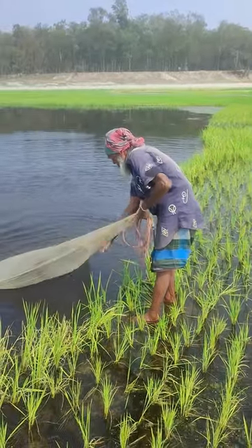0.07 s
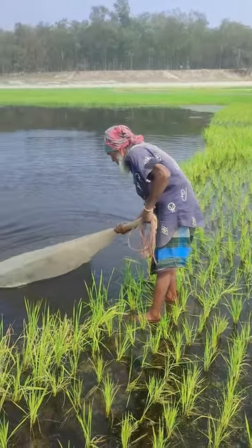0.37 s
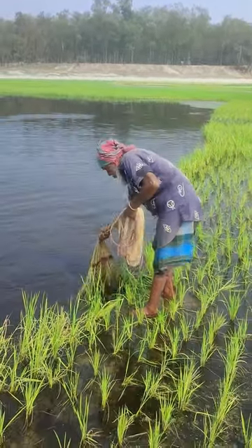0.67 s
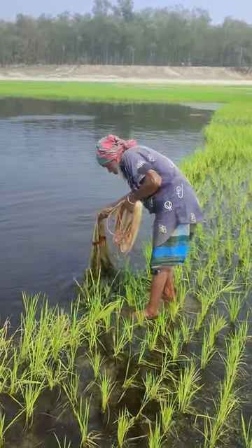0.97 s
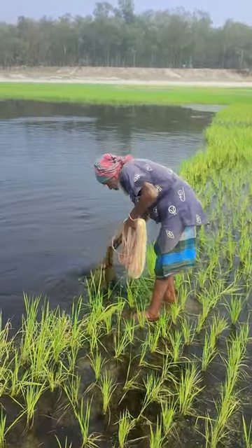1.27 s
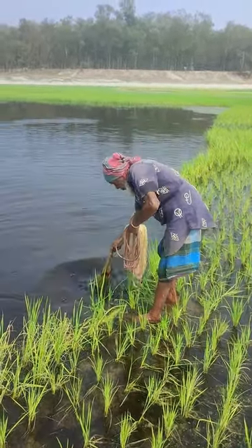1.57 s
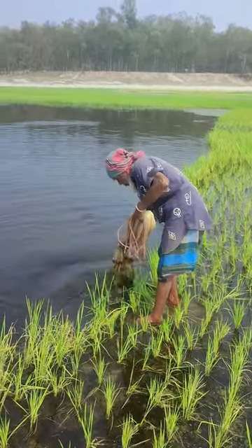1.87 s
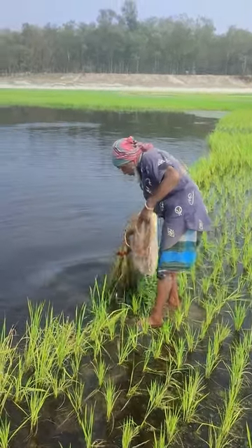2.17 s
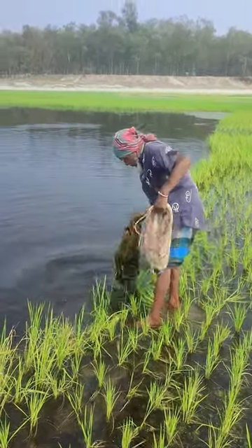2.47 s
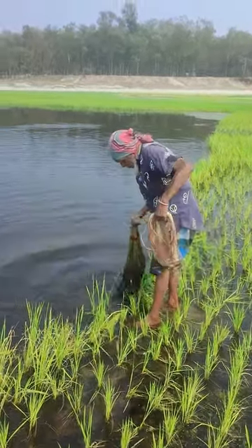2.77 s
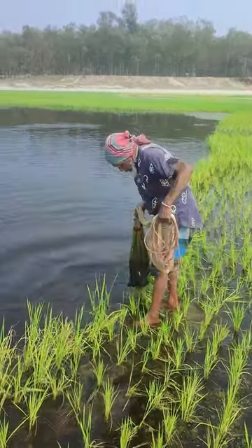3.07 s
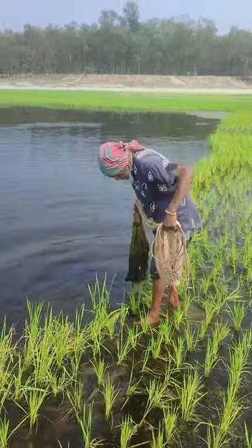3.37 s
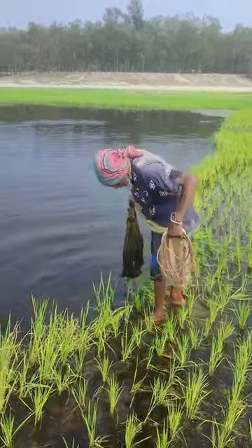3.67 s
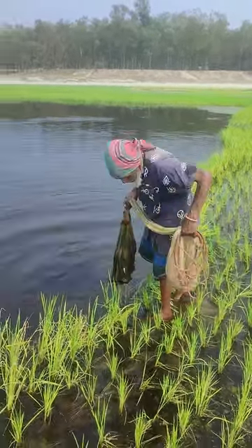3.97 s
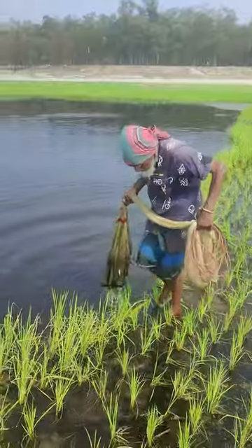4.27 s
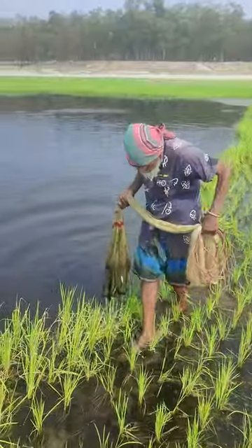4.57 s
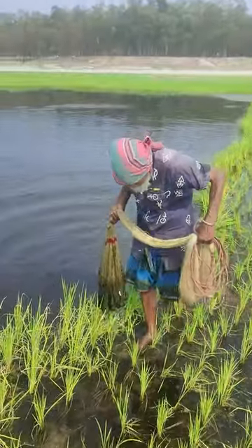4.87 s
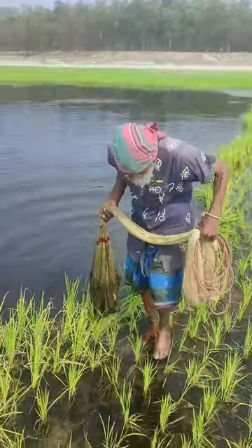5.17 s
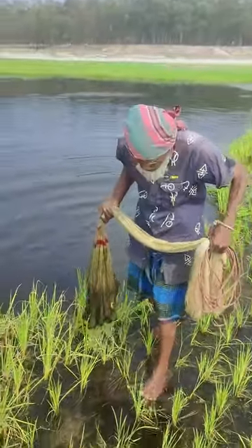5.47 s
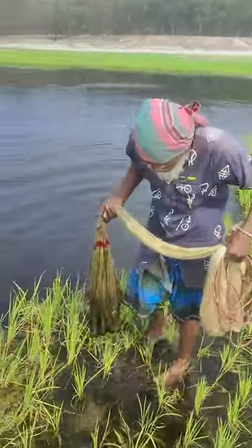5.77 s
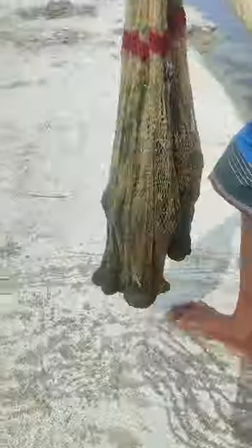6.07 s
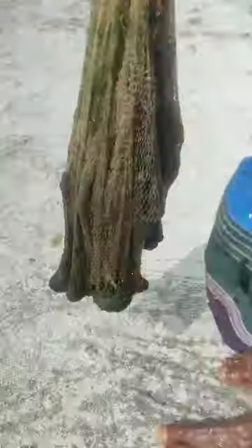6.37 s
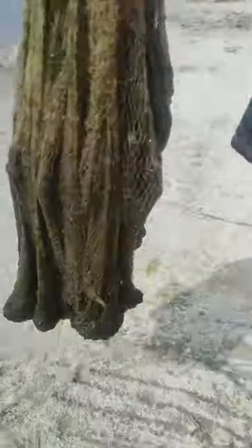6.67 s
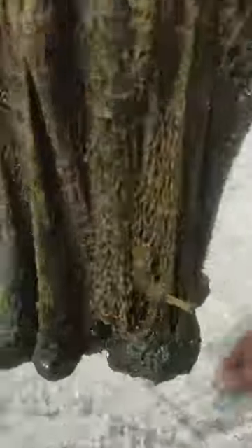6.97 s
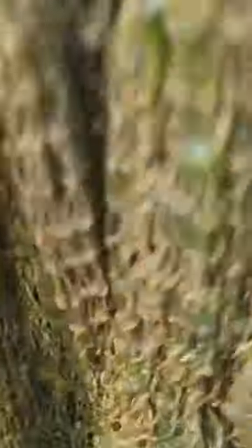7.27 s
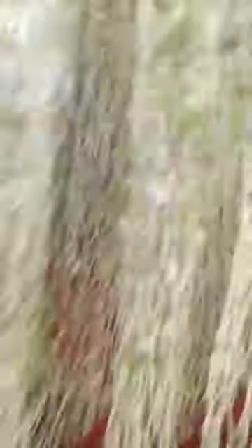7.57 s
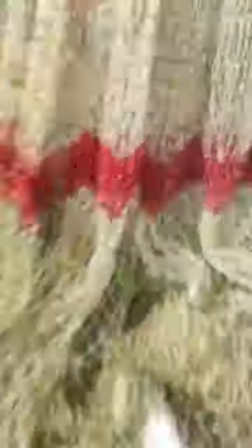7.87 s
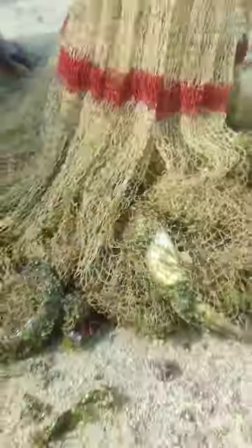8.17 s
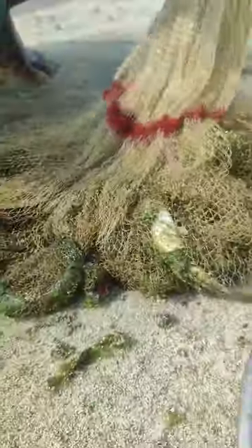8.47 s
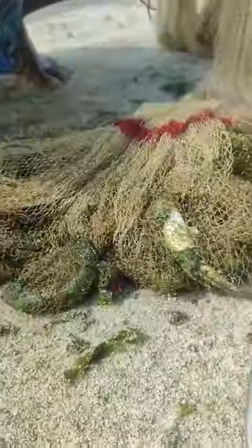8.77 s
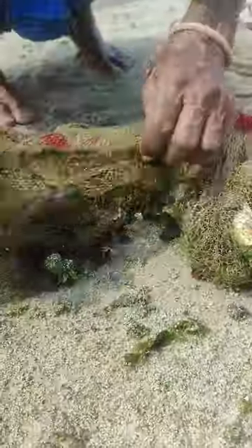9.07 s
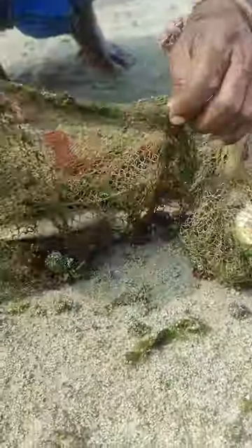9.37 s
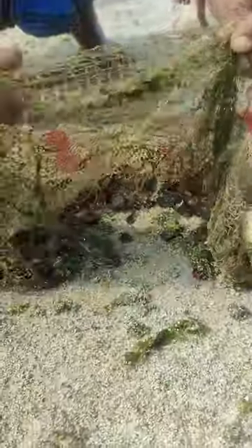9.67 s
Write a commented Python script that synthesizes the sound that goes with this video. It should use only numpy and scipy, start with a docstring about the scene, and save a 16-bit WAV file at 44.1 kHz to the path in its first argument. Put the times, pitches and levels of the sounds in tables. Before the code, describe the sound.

A wet fishing net is hauled from shallow water with small splashes, gurgles and pattering drips, and bare feet wade ashore a few metres away. Fingers rumble and knock on the microphone's right side. The water stops and the mesh swishes and ticks close by. The sound cuts out briefly and returns with loud pops on the right, followed by soft rustles and a squelch on sand. Light wind and a distant bird stay faint.

```python
"""Hauling a cast net

A wet net is pulled from shallow water: it splashes and drains in drips and ringing bubbles as bare
feet wade ashore. On the sand the mesh swishes, ticks and squelches. Light wind blows and a bird
calls far off. Fingers bump the phone's right microphone port; the sound drops out briefly and
that channel comes back with a few pops."""
import sys
import numpy as np
from scipy import signal
from scipy.fft import rfft, irfft
from scipy.io import wavfile
from scipy.ndimage import uniform_filter1d

SR = 44100
rng = np.random.default_rng(int(sys.argv[2]) if len(sys.argv) > 2 else 0)


def store_wav(level_fs):
    """Save 16-bit WAV to argv[1]."""
    pcm = np.round(np.clip(np.atleast_2d(level_fs), -1, 1) * 32767)
    wavfile.write(sys.argv[1], SR, pcm.T.astype(np.int16))


N = 433062
T = np.arange(N) / SR


def undb(db):
    """Decibels to gain."""
    return 10 ** (np.asarray(db) / 20)


def unit(x):
    """Scale to rms 1."""
    return x / np.sqrt(np.mean(x ** 2) + 1e-20)


def pan(left_minus_right_db):
    """Left and right gains."""
    return undb(np.array([[left_minus_right_db], [-left_minus_right_db]]) / 2)


def colour(x, spectrum):
    """Filter by a spectrum of (Hz, dB) points; rms 1."""
    hz, db = np.transpose(spectrum)
    bins_hz = np.maximum(np.fft.rfftfreq(x.shape[-1], 1 / SR), 1)
    gain = undb(np.interp(np.log(bins_hz), np.log(hz), db))
    return unit(irfft(rfft(x) * gain, x.shape[-1]))


def band(x, hz, q):
    """One resonance."""
    hz = min(hz, 0.4 * SR)
    return signal.lfilter(*signal.iirpeak(hz, max(q, 3 * hz / SR), fs=SR), x)


def steep_band(x, hz, q):
    """The same resonance twice."""
    return band(band(x, hz, q), hz, q)


def lowpass(x, hz, order):
    """Take off the treble."""
    return signal.lfilter(*signal.butter(order, hz, fs=SR), x)


def add(track, s, sound):
    """Mix a sound into a track at s seconds."""
    i = int(np.clip(s * SR, 0, N - 1))
    track[..., i:i + sound.shape[-1]] += sound[..., :N - i]


def walk(rate_hz):
    """Smooth random wander; rms 1."""
    step = int(SR / rate_hz)
    stairs = np.repeat(rng.standard_normal(N // step + 1), step)[:N]
    return unit(uniform_filter1d(stairs, step))


def swells(rows, rise_s, fall_s):
    """Gain from (start s, dB, hold s) rows: each rises, holds and dies away; overlaps add in power."""
    power = np.zeros(N)
    for s, db, hold_s in rows:
        rise = np.clip((T - s) / rise_s, 0, 1)
        fall = np.exp(-np.maximum(T - s - hold_s, 0) / fall_s)
        power += (undb(db) * rise * fall) ** 2
    return np.sqrt(power)


def crackle(per_s, spread_db, width=2.8):
    """Dense tiny impacts, each reaching the two ports with its own strength; rms 1."""
    size = undb(spread_db * np.minimum(rng.exponential(size=N), 5))
    at_ports = rng.choice([-1, 1], N) + width * rng.standard_normal((2, N))
    return unit((rng.random(N) < per_s / SR) * size * at_ports)


def outdoors(x, scatter_db, decay_s):
    """Direct sound plus brief scatter from water and plants, new for every spot and each port."""
    t = T[:SR // 50]
    response = rng.standard_normal((2, len(t))) * np.exp(-t / decay_s)
    response *= undb(scatter_db) / np.sqrt(np.sum(response ** 2, axis=1, keepdims=True))
    response[:, 0] += 1
    return signal.fftconvolve(x[None], response, axes=1) / np.sqrt(1 + undb(2 * scatter_db))


def bubble(hz, cycles, glide):
    """A bubble rings, fading 40 dB, and rises in pitch as it nears the surface."""
    age = np.arange(int(SR * cycles / hz) + 2) * hz / (SR * cycles)
    phase = 2 * np.pi * cycles * (age + glide * age ** 2 / 2)
    return np.sin(phase) * np.exp(-np.log(100) * age) * (1 - np.exp(-age * cycles))


def bubbles(low_hz, high_hz, cycles, spread_db, glide, count):
    """A shower of bubbles of mixed sizes; rms 1."""
    out = np.zeros((2, N))
    for when, pitch, weakness, life in rng.random((count, 4)):
        hz = low_hz * (high_hz / low_hz) ** pitch
        gain = np.sqrt(hz) * undb(-spread_db * np.log(max(weakness, 0.03)))
        ring = bubble(hz, cycles * (0.5 + life), glide * life)
        add(out, when * N / SR, gain * outdoors(ring, scatter_db=4, decay_s=0.015))
    return unit(out)


def contact(db, hz, decay_ms, q, pan_db):
    """A burst of contact noise through a short resonance."""
    t = T[:SR // 25]
    shared, left, right = rng.standard_normal((3, len(t)))
    burst = (shared + 3.6 * np.array([left, right])) * np.exp(-1000 * t / decay_ms)
    ring = steep_band(burst, hz, q)
    return ring / np.abs(ring).max() * undb(db) * pan(pan_db)


def slurs(notes, bend, waver, rough_db, scatter_db):
    """Unsteady gliding tones that swell quickly and fade; with bend under 1 the glide flattens out."""
    out = np.zeros((2, N))
    wobble = 1 + waver * walk(300)
    flutter = unit(undb(rough_db * walk(400)))
    for s, db, start_hz, end_hz, length_s in notes:
        age = np.linspace(0, 1, int(length_s * SR))
        span = slice(int(s * SR), int(s * SR) + len(age))
        hz = start_hz * (end_hz / start_hz) ** (age ** bend) * wobble[span]
        envelope = undb(db) * np.sin(np.pi * age ** 0.46) * flutter[span]
        tone = envelope * np.sin(2 * np.pi * np.cumsum(hz) / SR)
        add(out, s, outdoors(tone, scatter_db, decay_s=0.013))
    return out


# Open-air spectrum. Each row: frequency in Hz, relative level in dB.
AIR_SPECTRUM = [(12, -33.5), (20, 1.5), (91, -3.5), (177, -12.5), (204, -16), (328, -22), (422, -23),
                (527, -23.5), (607, -27), (820, -27), (1660, -33.5), (5530, -41.5), (7310, -49.5),
                (14700, -39.5), (16000, -54)]
# Gusts on the ports. Each row: start in seconds, level in dB, hold in seconds.
GUSTS = [(5.9, -52, 1), (6.8, -48, 0.634)]


def air():
    """Light wind and far countryside, partly alike at the two ports; gusts as the phone is carried."""
    level = np.hypot(undb(-58), swells(GUSTS, rise_s=0.18, fall_s=0.025))
    noise = rng.standard_normal(N) + 1.06 * rng.standard_normal((2, N))
    return colour(noise, AIR_SPECTRUM) * level * undb(0.28 * walk(5.6))


# Pulls on the net. Each row: start in seconds, flow level in dB, hold in seconds, spray offset in dB.
PULLS = [(0, -65, 0.01, 0), (0.893, -65.5, 0.46, -4), (1.235, -63, 0.31, -1), (1.92, -58.5, 0.55, -4),
         (2.596, -52.5, 0.17, -2.5), (3.093, -72.5, 1.6, 5.5), (3.473, -61, 1.29, 1.5),
         (4.63, -61, 1.63, 1)]
PULL_RISE_S, DRAIN_S, TRICKLE_DB, ASHORE_S = 0.039, 0.25, -80.5, 5.95


def flow():
    """Bubble and spray gains: each pull lifts wet mesh that streams and drains, until it is ashore."""
    over_water = np.clip((ASHORE_S - T) / 0.0042 + 1, 0, 1)
    bubble_rows = [(s, db, hold_s) for s, db, hold_s, _ in PULLS]
    spray_rows = [(s, db + spray_db, hold_s) for s, db, hold_s, spray_db in PULLS]
    gains = [swells(rows, PULL_RISE_S, DRAIN_S) for rows in (bubble_rows, spray_rows)]
    return over_water * np.hypot(gains, undb(TRICKLE_DB))


# Spectrum of landing spray. Each row: frequency in Hz, relative level in dB.
SPRAY_SPECTRUM = [(300, -7), (500, -18), (900, -8), (1450, -10.5), (2000, -1), (3800, -3.5), (6800, -7),
                  (8500, -16), (10500, -19), (13000, -13.5), (16000, -25)]


def runoff(bubbling, spraying):
    """Water falls from the mesh in spurts: spray fizzes, small drops patter, larger ones trap bubbles."""
    spurts = undb(1.8 * walk(45))
    plops = bubbles(low_hz=608, high_hz=1876, cycles=30, spread_db=3.5, glide=0.16, count=3200)
    patter = bubbles(low_hz=1640, high_hz=7050, cycles=22, spread_db=5.5, glide=0.05, count=4000)
    drips = bubbles(low_hz=3100, high_hz=13100, cycles=2.4, spread_db=5.5, glide=0.057, count=700)
    fizz = colour(crackle(per_s=900, spread_db=1.5, width=0.69), SPRAY_SPECTRUM)
    spray = patter * undb(-5.5) + drips * undb(-17) + fizz * undb(-5)
    return spurts * (bubbling * plops * undb(-4) + spraying * spray)


PLINK_HZ, SPATTER_HZ, SPATTER_SPREAD_OCT = 1900, 3020, 0.58
REBOUND_MEAN_GAP_S, REBOUND_DB = 0.008, -8


def spatters(spraying, count):
    """Drops fall at random; each traps a ringing bubble, breaks up and lands again in weaker ticks."""
    out = np.zeros((2, N))
    for i, (size, pitch, side) in zip(rng.integers(0, N, count), rng.standard_normal((count, 3))):
        s, db = T[i], 14.5 + 2.5 * size
        plink = undb(db - 1) * bubble(PLINK_HZ * 2 ** (SPATTER_SPREAD_OCT * pitch), cycles=38, glide=0.12)
        add(out, s, spraying[i] * outdoors(plink, scatter_db=0, decay_s=0.008))
        for gap, detune in rng.random((3, 2)):
            hz = SPATTER_HZ * 2 ** (SPATTER_SPREAD_OCT * (pitch + 2 * detune - 1))
            add(out, s, spraying[i] * contact(db, hz, decay_ms=1.5, q=1.4, pan_db=-1.5 + 2.4 * side))
            s += 2 * gap * REBOUND_MEAN_GAP_S
            db += REBOUND_DB
    return out


# Bright ticks. Each row: start in seconds, level in dB, ring in Hz, decay in ms.
TICKS = [(0.022, -50, 2570, 1.5), (.058, -50, 3500, 1.2), (.169, -42.5, 1960, 4.9), (1.462, -53, 4600, 1.2),
         (2.68, -34.5, 2600, 2), (3.534, -37.5, 4000, 2.5), (3.621, -39.5, 5200, 1.5),
         (3.688, -39.5, 3500, 2), (3.975, -46, 2900, 2), (4.092, -46, 4260, 1.7), (4.115, -48, 4500, 2),
         (4.332, -50, 2400, 2), (4.468, -36.5, 3860, 1.3), (4.654, -39, 2330, 3), (4.734, -38, 3900, 1.3),
         (4.888, -37, 4880, 2.1), (4.919, -40.5, 2300, 2.2), (4.963, -40, 2420, 2), (5.151, -39, 3670, 1.2),
         (5.345, -43.5, 11000, 1.8), (5.726, -34.5, 2100, 2.4), (5.79, -43, 11000, 4.5),
         (5.924, -39, 5570, 2.3), (6.085, -34.5, 2400, 3.2), (6.31, -39, 12500, 1.17),
         (6.332, -48.5, 2500, 1.2), (6.449, -42, 1870, 0.87), (6.818, -39, 3480, 1.3),
         (6.844, -40.5, 5760, 1.5), (7.166, -38, 5500, 1.2), (7.2015, -29, 8400, 0.37),
         (7.244, -37, 9000, 0.68), (7.282, -41, 3900, 0.63), (7.86, -37, 6600, 0.71),
         (7.8943, -30.5, 12000, 2.2), (9.079, -43.5, 8180, 9), (9.353, -41, 9900, 1.3),
         (9.404, -37, 3020, 1.8), (9.418, -35.5, 11000, 1.6)]


def ticks():
    """Drops, knots and grit strike and ring briefly."""
    out = np.zeros((2, N))
    for s, db, hz, decay_ms in TICKS:
        add(out, s, contact(db, hz, decay_ms, q=1.02, pan_db=-1.5))
    return out


# Dry taps. Each row: start in seconds, level in dB, centre in Hz, left minus right in dB, cutoff in Hz.
TAPS = [(.039, -50, 1100, -2, 4000), (0.061, -44, 445, -16, 4000), (5.52, -37, 590, -1, 4000),
        (5.562, -38.5, 664, -20, 4000), (5.6127, -29, 1200, -5, 5000), (6.029, -37.5, 292, 4, 900),
        (6.2275, -35, 446, -1, 2500), (6.23, -37, 580, -1, 3200), (8.087, -47, 440, -6, 4000),
        (8.184, -48, 506, 0, 4000), (8.448, -45.5, 450, -1, 800), (8.48, -47, 430, 0, 804),
        (8.565, -53, 490, 5, 885), (9.226, -34.5, 930, 2, 2190)]
GRIT_DB, GRIT_DECAY_MS = -17, 1.5


def taps():
    """Handling, a footstep on the sand and the settling net: each tap is one sharp, damped push with grit
    crunching after it."""
    out = np.zeros((2, N))
    t = T[:SR // 25]
    for s, db, hz, pan_db, cutoff_hz in TAPS:
        push = undb(GRIT_DB) * rng.standard_normal((2, len(t))) * np.exp(-1000 * t / GRIT_DECAY_MS)
        push[:, 0] += 1
        tap = lowpass(band(push, hz, q=1), cutoff_hz, order=2)
        add(out, s, tap / np.abs(tap).max() * undb(db) * pan(pan_db))
    return out


def from_below(x, lag_ms=0.484, shadow_db=-2.5, dull_share=0.17):
    """The phone's body delays and shades sound from below on its way to the left port."""
    left = np.interp(T - lag_ms / 1000, T, x[0])
    left += dull_share * (lowpass(left, hz=2500, order=1) - left)
    return np.array([left, x[1]]) * pan(shadow_db)


# Spectra of slow rubbing and quick slips. Each row: frequency in Hz, relative level in dB.
RUB_SPECTRUM = [(250, 6.5), (700, 3.5), (2000, 5), (4000, 1.5), (7000, 5), (9500, -11), (13000, 0),
                (16000, -58)]
SLIP_SPECTRUM = [(300, 10), (900, -4), (1400, -4), (2000, -13), (3000, -1.5), (4100, -6.5), (5300, 8.5),
                 (6800, 5.5), (9000, -5), (13000, 10), (16000, 11)]
# The mesh is carried, lowered and spread. Each row: start in seconds, level in dB, hold in seconds.
RUBS = [(5.9, -67.5, 0.5), (6.42, -64.5, 0.66), (6.83, -61.5, 0.25), (7.14, -59.5, 0.11), (7.6, -78, 1),
        (8.3, -73.5, 1), (8.74, -65, 0.11), (9.33, -67, 0.13), (9.52, -69.5, 0.22)]
# Resonances of a quick scrape. Each row: frequency in Hz, Q, relative level in dB.
HOLLOW_MODES = [(1896, 2.9, 11), (3850, 13, 7), (6400, 2.3, -12)]
# Swishes. Each row: peak time in seconds, level in dB, rise and fall in seconds, centre in Hz,
# hollow ring over the rasp in dB.
SWISHES = [(.048, -60.5, 0.036, 0.037, 1210, -10), (6.045, -52.5, 0.022, 0.024, 900, -1.5),
           (6.058, -70.5, 0.01, 0.069, 2960, 13), (6.22, -58.5, 0.047, .015, 2020, -10),
           (6.486, -55, 0.013, 0.016, 2970, -4), (6.56, -56, 0.072, 0.062, 1870, -21),
           (6.555, -49.5, 0.004, 0.009, 2500, -20), (6.9, -49, 0.011, 0.036, 1850, 2.5),
           (6.98, -52.5, 0.011, 0.02, 3650, -9), (7.225, -51, 0.05, 0.047, 576, -20),
           (7.262, -56.5, 0.018, 0.021, 3880, -10), (8.575, -53, 0.013, 0.011, 800, -25),
           (8.595, -56.5, 0.014, 0.011, 1690, -19), (8.993, -51, 0.094, 0.0055, 1350, -4),
           (8.98, -55, 0.07, 0.017, 6940, -27), (8.88, -72, 0.092, 0.077, 1800, -13),
           (9.425, -50, 0.0064, 0.022, 1230, -11), (9.464, -57, 0.0037, 0.0055, 4000, -1),
           (9.684, -60, 0.0089, 0.0088, 3800, -13)]


def mesh():
    """Wet twine slides over itself and sand in tiny slips; quick pulls rasp with a hollow ring."""
    rubbing = swells(RUBS, rise_s=0.05, fall_s=0.059) * undb(1.5 + 1.5 * walk(35))
    out = colour(crackle(per_s=2400, spread_db=2, width=2.4), RUB_SPECTRUM) * rubbing
    slips = colour(crackle(per_s=5500, spread_db=1.5, width=1), SLIP_SPECTRUM)
    hollow = unit(sum(undb(db) * steep_band(slips, hz, q) for hz, q, db in HOLLOW_MODES))
    for s, db, rise_s, fall_s, hz, hollow_db in SWISHES:
        rasp = unit(steep_band(slips, hz, q=1))
        envelope = np.exp(-((T - s) / np.where(T < s, rise_s, fall_s)) ** 2)
        out += undb(db) * (rasp + undb(hollow_db) * hollow) * envelope
    return from_below(out)


# Bird calls. Each row: start in seconds, level in dB, start and end pitch in Hz, length in seconds.
BIRD_NOTES = [(0.1, -68, 1280, 860, 0.029), (.508, -62, 1430, 780, 0.037), (.588, -64.5, 1210, 830, 0.04),
              (.627, -69, 1380, 1000, .028), (.665, -66, 1200, 870, 0.068), (.765, -65, 1220, 930, 0.027),
              (1.705, -64, 1700, 1480, 0.08), (6.37, -61, 1330, 930, 0.059), (7.728, -78, 1300, 900, .04),
              (8.312, -69, 1250, 1160, 0.021), (8.408, -67, 1390, 1110, 0.035),
              (8.545, -65, 1240, 980, 0.032)]


def bird():
    """A far bird calls in short falling notes."""
    return slurs(BIRD_NOTES, bend=0.9, waver=0.025, rough_db=2, scatter_db=-7)


# Air pockets. Each row: start in seconds, level in dB, start pitch in Hz, length in seconds,
# rise in octaves per second.
GULPS = [(0.998, -60, 1620, .011, 7), (1.011, -55, 1890, 0.011, 3), (1.109, -56, 1230, 0.014, 3),
         (1.238, -51, 840, .008, 12), (1.266, -32, 700, 0.0061, 25), (1.269, -50.5, 238, 0.062, 24.5),
         (1.264, -40, 1760, 0.0064, 15), (1.283, -39, 1314, 0.013, 19), (1.31, -46, 2350, 0.015, 8),
         (1.339, -50, 2660, 0.011, 0), (1.353, -56, 660, 0.017, 17), (1.434, -58.5, 1346, 0.16, 4.5),
         (1.69, -53, 1350, .02, -3), (1.85, -49, 686, 0.021, 18), (1.869, -51, 930, 0.019, 66.5),
         (1.886, -40, 1140, 0.013, 6), (1.923, -52.5, 546, 0.019, 20), (2.385, -52, 310, 0.037, 18.5),
         (2.565, -53, 1754, .011, 12), (2.657, -48, 480, 0.028, 18), (2.67, -48, 795, 0.012, 65),
         (2.732, -45, 583, 0.014, 17), (2.771, -47, 1550, 0.0063, 21), (2.772, -44, 650, 0.011, 23),
         (2.911, -47, 556, 0.013, 17), (3.373, -53, 546, 0.03, 33), (4.168, -48, 2000, 0.0097, 5),
         (4.434, -55, 1300, 0.039, -15), (4.667, -36.5, 1074, 0.011, 21), (4.708, -42, 675, 0.01, 24),
         (4.853, -47, 684, 0.013, 23), (4.919, -47, 766, 0.011, 7), (5.093, -49, 810, 0.013, -4),
         (5.837, -48, 480, 0.083, 18), (9.539, -54.5, 350, 0.067, -2.5), (9.543, -60, 1900, .008, 3),
         (9.671, -55, 2270, .011, 1), (9.708, -54, 800, 0.013, 1), (9.772, -52, 667, 0.012, 5)]


def gulps():
    """Large air pockets close and ring roughly, most of them rising in pitch."""
    notes = [(s, db, hz, hz * 2 ** (oct_per_s * length_s), length_s)
             for s, db, hz, length_s, oct_per_s in GULPS]
    return slurs(notes, bend=0.96, waver=0.07, rough_db=3, scatter_db=-2)


# Splashes. Each row: start in seconds, level in dB, decay in seconds, lowest bubble in Hz.
SPLASHES = [(1.234, -58.5, 0.034, 694), (1.265, -48, 0.041, 596), (1.337, -60, 0.0072, 1200),
            (1.551, -55.5, 0.017, 1230), (1.873, -54, 0.022, 890), (1.886, -55, 0.02, 850),
            (2.059, -52, 0.029, 840), (2.37, -61, 0.071, 416), (2.618, -75, 0.0071, 1010),
            (2.64, -57, 0.036, 1500), (2.678, -53.5, 0.014, 890), (2.725, -56, 0.031, 484),
            (2.768, -52.5, 0.031, 604), (2.837, -62, .008, 900), (3.63, -59.5, 0.084, 391),
            (3.968, -54, 0.0064, 1510), (4.083, -54.5, 0.01, 1680), (4.16, -55, 0.024, 930),
            (4.331, -57.5, 0.0076, 1550), (4.488, -57, 0.0029, 1170), (4.66, -54, 0.028, 950),
            (4.719, -57.5, 0.052, 358), (4.957, -61, .007, 1400), (5.146, -62, 0.0086, 1030),
            (5.286, -56.5, .02, 1200), (5.344, -51.5, 0.021, 1370), (5.425, -51, 0.015, 1030)]


def splashes():
    """The net or a foot breaks the surface: a burst of spray and a cloud of bubbles die away together."""
    out = np.zeros((2, N))
    spray = colour(crackle(per_s=2000, spread_db=0.5, width=0.65), SPRAY_SPECTRUM)
    for s, db, decay_s, low_hz in SPLASHES:
        start, t = int(s * SR), T[:int(6 * decay_s * SR)]
        envelope = np.exp(-t / decay_s) * (1 - np.exp(-t / 0.0019))
        add(out, s, undb(db - 2.5) * spray[:, start:start + len(t)] * envelope)
        for delay, pitch, weakness in rng.random((32, 3)):
            gain = undb(db + 10.5 - 5.9 * weakness - 6.8 * delay)
            ring = gain * bubble(low_hz * 3.68 ** pitch, cycles=12.7, glide=0.13)
            add(out, s + 2.2 * decay_s * delay, outdoors(ring, scatter_db=-6.5, decay_s=0.015))
    return out


# Port resonances. Each row: frequency in Hz, Q, relative level in dB.
PORT_MODES = [(480, 2.9, -5), (990, 3.5, -3.5), (1380, 7.6, -14), (3350, 3.1, -18)]
# Sharp finger contacts. Each row: time in seconds, peak in dB, contact in ms, ringing share from 0 to 1.
SNAPS = [(4.216, -32, 0.2, 0.45), (4.807, -29, 0.21, 0.55), (5.608, -29, 0.28, 0.3),
         (5.6142, -4.5, 0.058, 0.98), (6.553, -19, 0.062, 0), (6.555, -27, 0.71, 0.3),
         (7.181, -25.5, 0.16, 0.6), (7.196, -16.5, 0.091, 0.2), (7.2077, -7, 0.12, 0.5),
         (7.244, -27, 0.044, 0.3), (7.283, -25.5, 0.13, 0.4), (7.765, -38, 0.17, 0.8),
         (7.886, -28, 0.092, 0.6), (8.086, -23, 0.073, 0.45), (8.1817, -24.5, 0.068, 0.57)]


def snaps():
    """Skin strikes the port: a sharp push of air leaks in and rings its small cavity."""
    out = np.zeros(N)
    t = T[:SR // 20] - T[SR // 40]
    for s, db, contact_ms, ring_share in SNAPS:
        push = np.exp(-(1000 * t / contact_ms) ** 2)
        leak = signal.lfilter(*signal.butter(1, 280, "high", fs=SR), push)
        ring = sum(undb(mode_db) * band(push, hz, q) for hz, q, mode_db in PORT_MODES)
        snap = (1 - ring_share) * leak + ring_share * ring
        add(out, s + t[0], undb(db) * snap / np.abs(snap).max())
    return out


# Shifts of the grip. Each row: start in seconds, level in dB, hold in seconds.
GRIPS = [(4.75, -45.5, 0.68), (5.2, -58, 0.091), (5.5, -63, 1), (6.5, -47, 0.92), (6.95, -43.5, 0.45),
         (7.6, -57, 0.32)]


def grip():
    """Skin shifts against the port and rumbles."""
    spectrum_hz_db = [(15, 0), (60, -1), (140, -8.5), (300, -19.5), (700, -26), (2000, -36.5),
                      (8000, -49)]
    rumble = colour(crackle(per_s=400, spread_db=0)[1], spectrum_hz_db)
    return rumble * swells(GRIPS, rise_s=0.21, fall_s=0.23)


# Soft finger contacts. Each row: time in seconds, peak in dB, pitch in Hz.
BUMPS = [(5.011, -26.5, 217), (5.119, -25, 118), (5.172, -34, 184), (5.215, -33, 137), (5.262, -33, 168),
         (5.32, -34, 162), (5.368, -35.5, 169), (5.412, -39, 139), (5.615, -18.5, 463), (5.884, -28.5, 193),
         (6.556, -23.5, 65.5), (6.71, -32.5, 135), (6.724, -23.5, 68), (6.978, -29.5, 127),
         (7.179, -31, 87), (7.2, -26, 136), (7.267, -31, 127), (8.856, -42, 172)]


def bumps():
    """A finger presses air into the port in one rounded pulse."""
    out = np.zeros(N)
    t = T[:SR // 20] - T[SR // 40]
    for s, db, hz in BUMPS:
        phase = np.pi * hz * t
        add(out, s + t[0], undb(db) * (1 - 2 * phase ** 2) * np.exp(-phase ** 2))
    return out


# Jumps of the right channel's offset. Each row: time in seconds, step in full scale.
POPS = [(7.403, -0.058), (7.463, 0.16), (7.523, 0.13), (7.583, .12), (7.643, 0.027)]
# Drift of that offset. Each row: time in seconds, rate in full scale per second.
DRIFT = [(7.403, -7), (7.64, -3), (7.68, 2)]


def pops(settle_s):
    """The right channel's offset drifts, jumps in pops and leaks away through the coupling filter."""
    change = np.interp(T, *np.transpose(DRIFT), left=0, right=0) / SR
    for s, step in POPS:
        add(change, s, np.array([step]))
    offset = signal.lfilter([1], [1, -np.exp(-1 / (settle_s * SR))], change)
    return offset * np.array([[0], [1]])


# Spectrum of sodden mesh. Each row: frequency in Hz, relative level in dB.
SQUELCH_SPECTRUM = [(400, 3.5), (750, 10.5), (1400, 0), (2800, 3), (6500, -4)]


def squelch():
    """The hand lifts a fold of sodden mesh and small wet pockets crackle open."""
    lift = np.interp(T, [9.46, 9.55, 9.82], [0, 0.9, 1])
    pockets = bubbles(low_hz=280, high_hz=4270, cycles=3.3, spread_db=2.5, glide=0.03, count=3200)
    crackles = colour(crackle(per_s=250, spread_db=-0.5), SPRAY_SPECTRUM)
    return (colour(pockets, SQUELCH_SPECTRUM) * undb(-65) + crackles * undb(-71.5)) * lift


def scene():
    """Water a few metres off, the net close by, fingers on the right port."""
    bubbling, spraying = flow()
    water = runoff(bubbling, spraying) + spatters(spraying, count=130) + splashes() + gulps()
    net = mesh() + squelch() + ticks() + taps()
    background = bird() + air()
    fingers = (snaps() + grip() + bumps()) * np.array([[undb(-47)], [1]])
    return water + net + background + fingers


DROPOUT_START_S, DROPOUT_END_S, RECOVER_S = 7.29, 7.403, 0.18
TOP_HZ = 15700


def record(dry):
    """The sound drops out briefly, the right channel pops as it fades back in, and the top is cut."""
    gate = (T < DROPOUT_START_S) + np.clip((T - DROPOUT_END_S) / RECOVER_S, 0, 1)
    out = dry * uniform_filter1d(gate, size=128) + pops(settle_s=0.21)
    return signal.sosfilt(signal.ellip(8, 0.2, 70, TOP_HZ, fs=SR, output="sos"), out)


dry = scene()
out = record(dry)
store_wav(out)
```